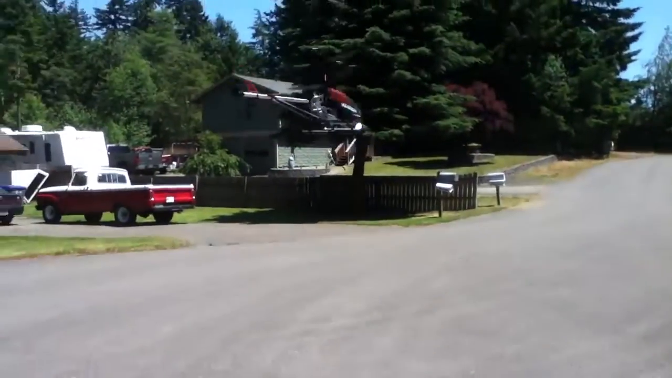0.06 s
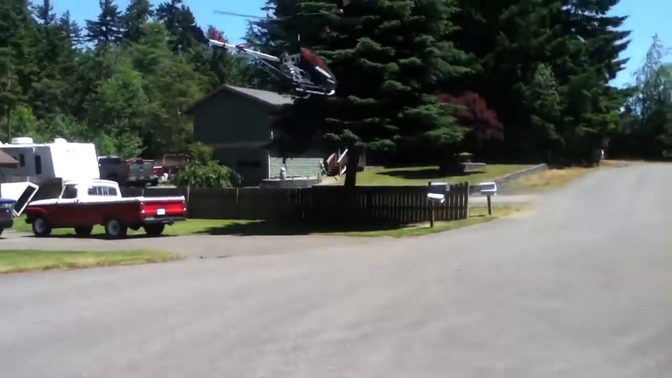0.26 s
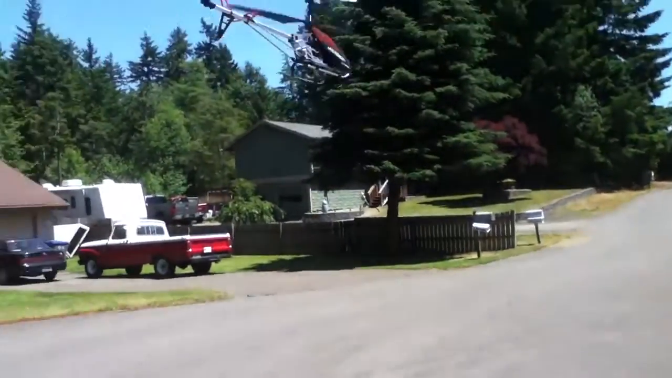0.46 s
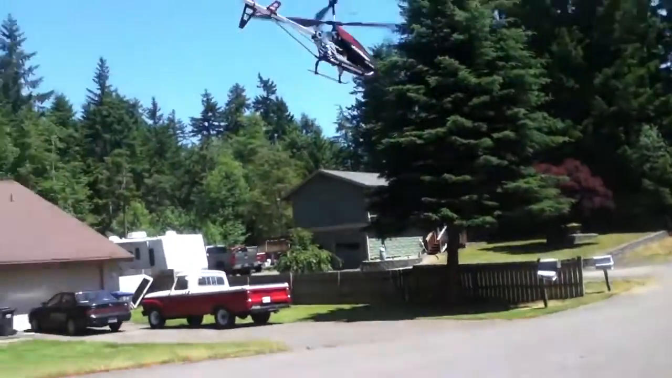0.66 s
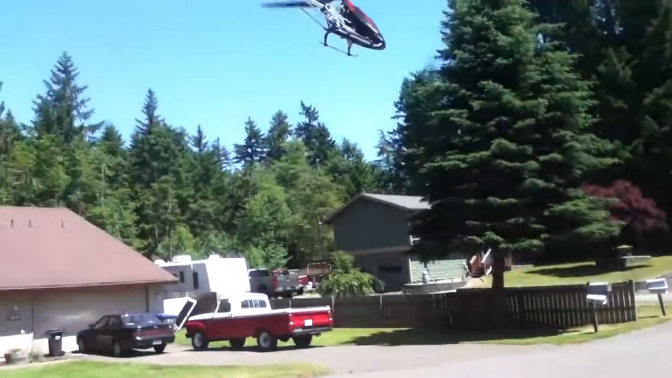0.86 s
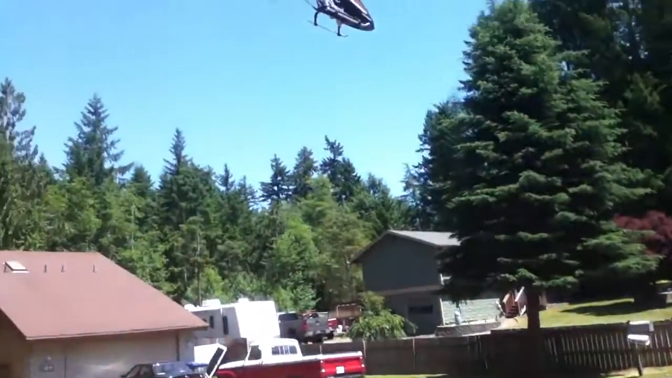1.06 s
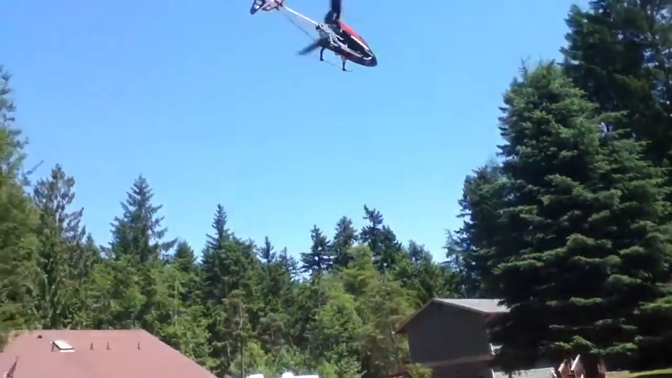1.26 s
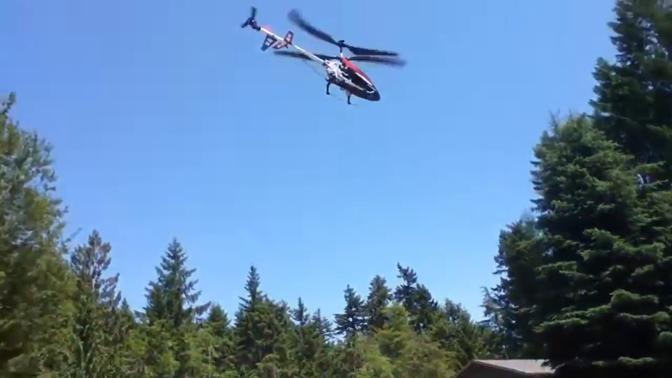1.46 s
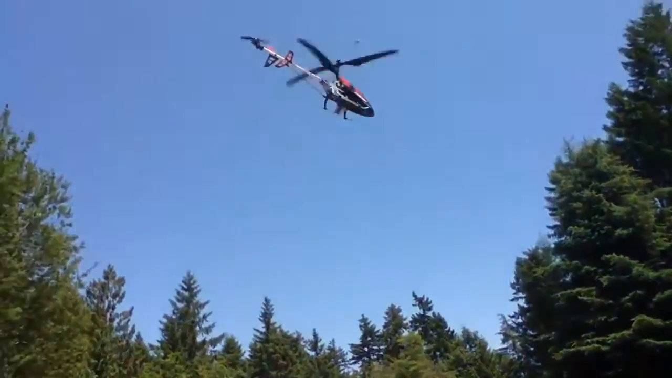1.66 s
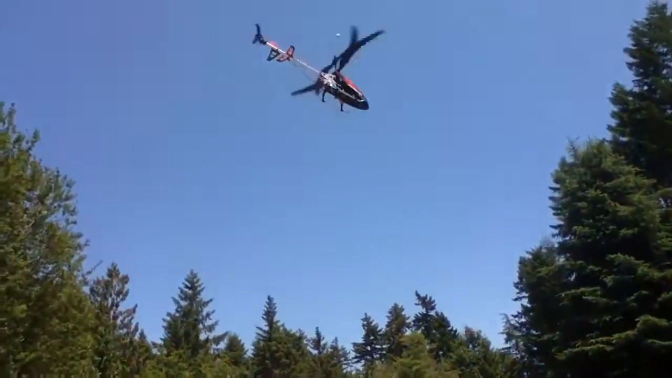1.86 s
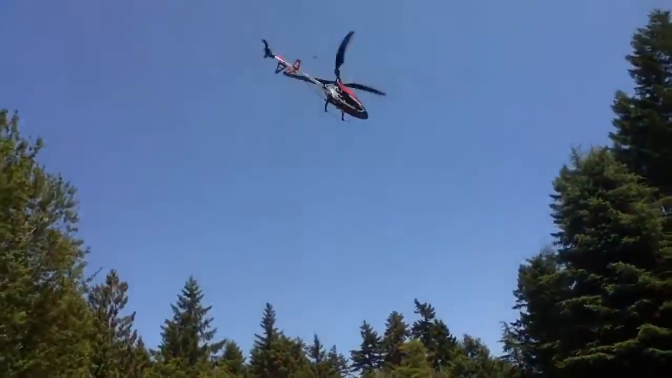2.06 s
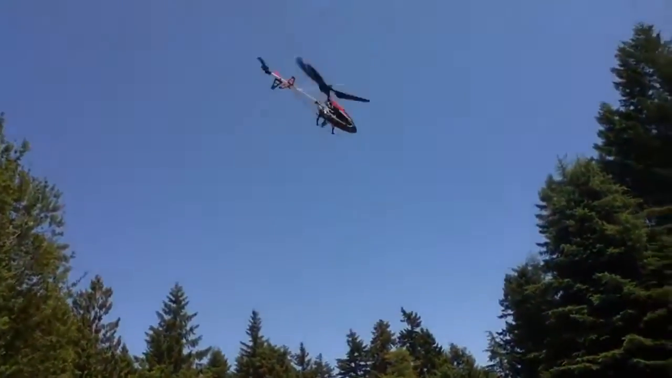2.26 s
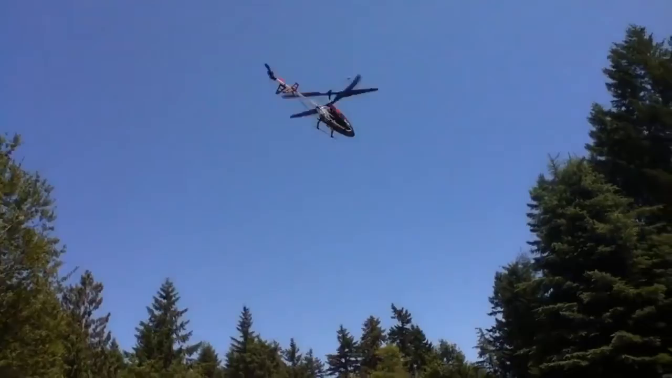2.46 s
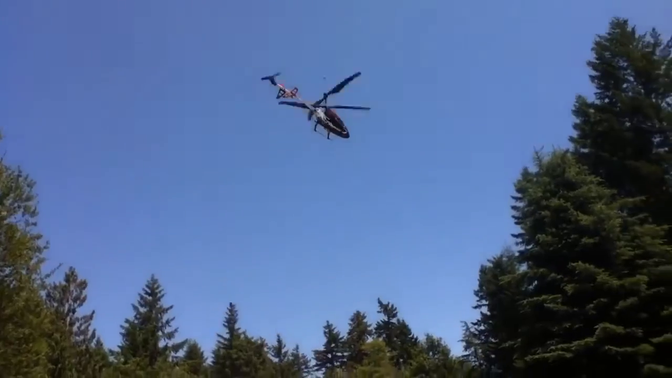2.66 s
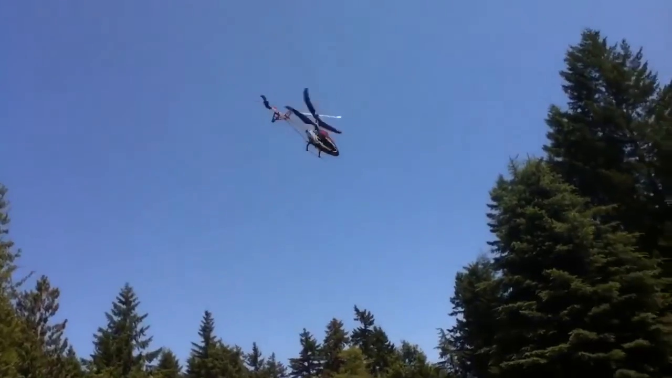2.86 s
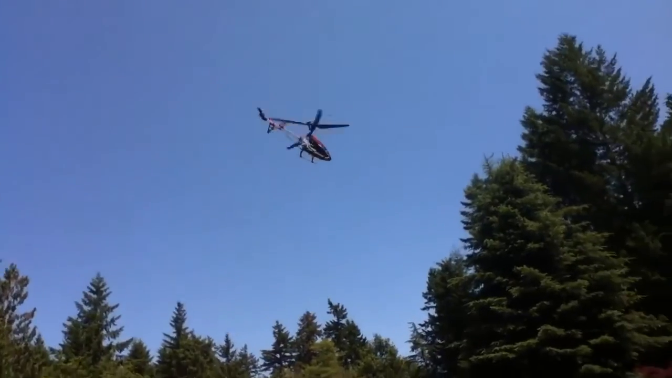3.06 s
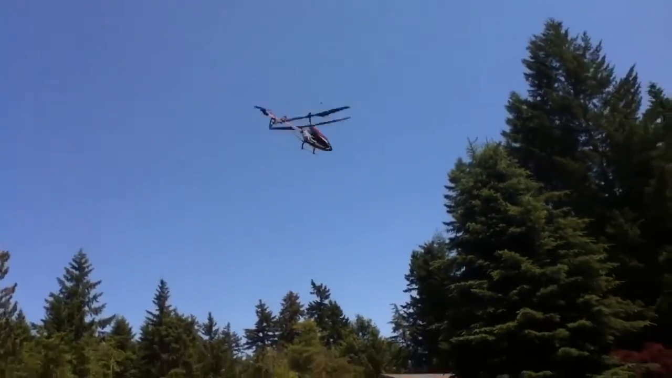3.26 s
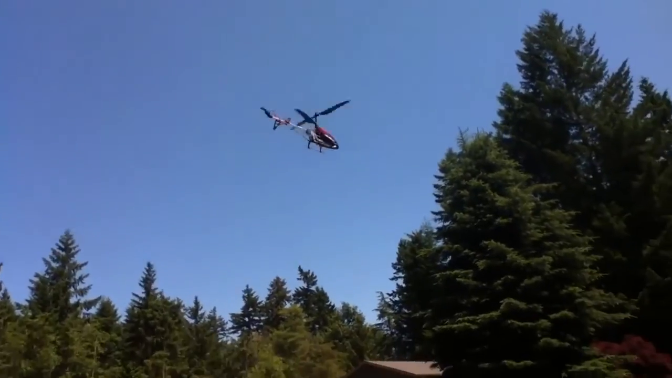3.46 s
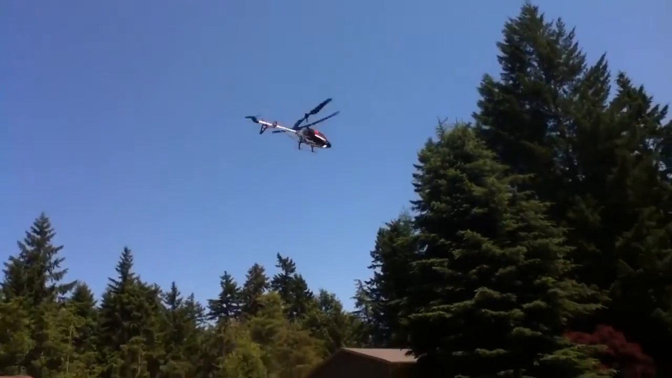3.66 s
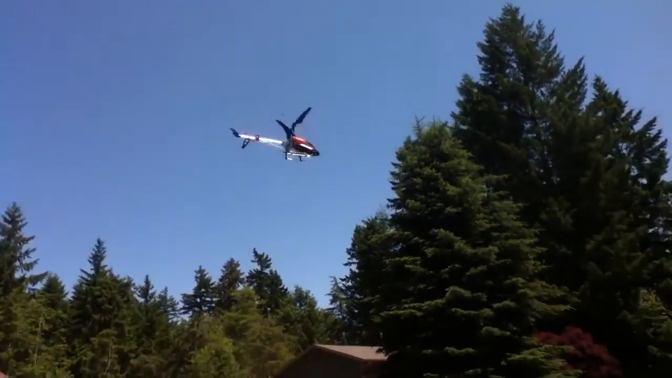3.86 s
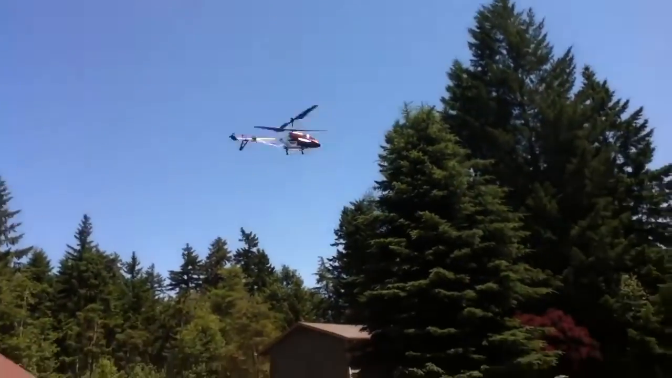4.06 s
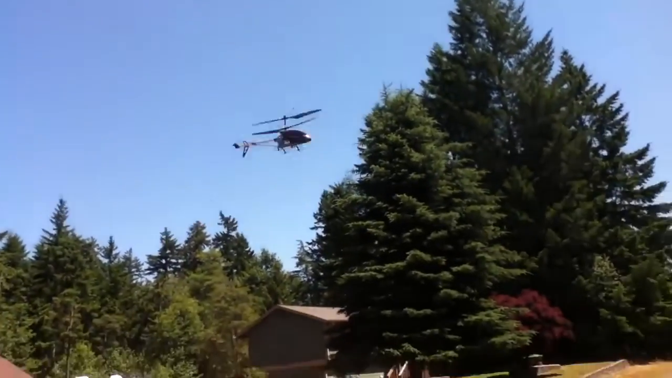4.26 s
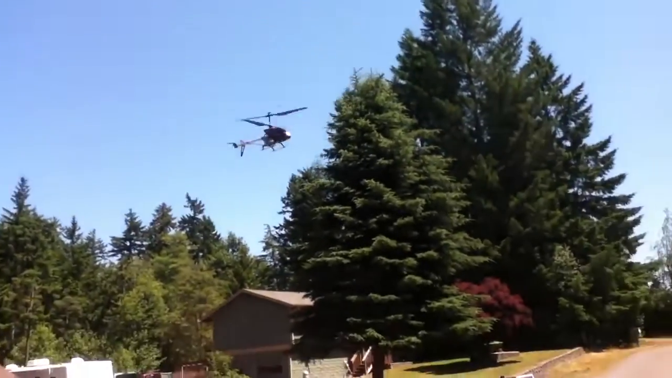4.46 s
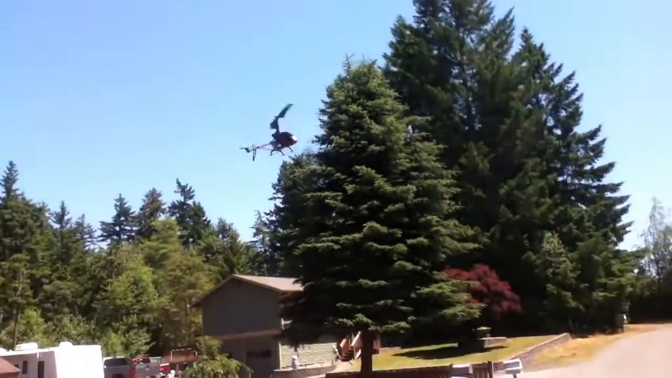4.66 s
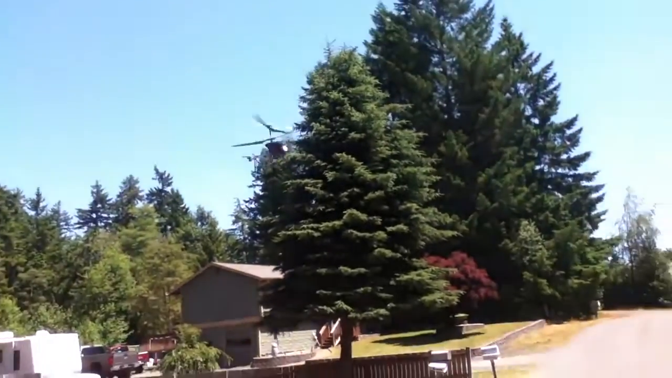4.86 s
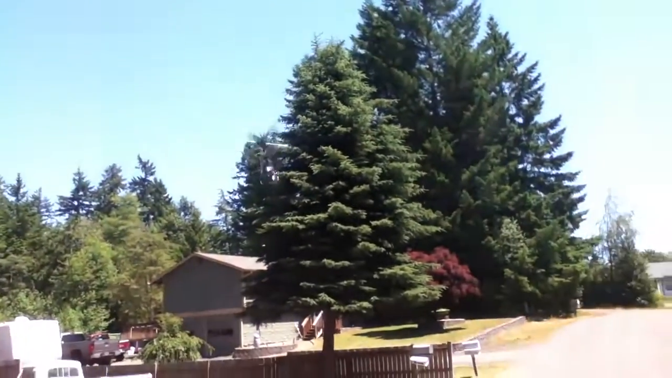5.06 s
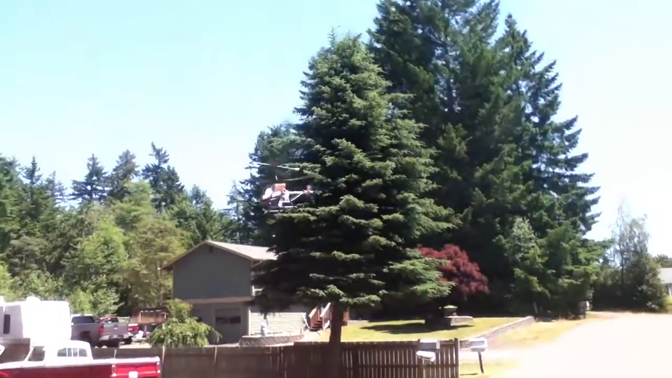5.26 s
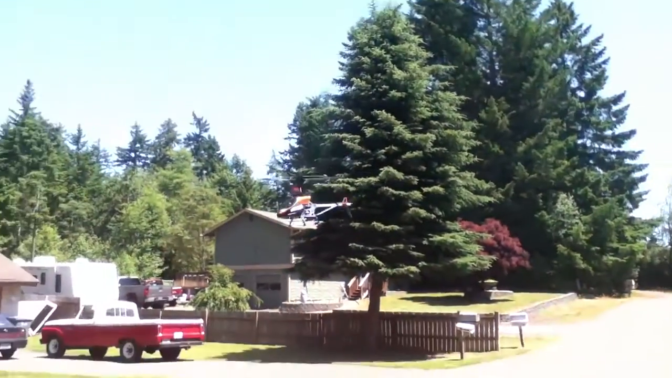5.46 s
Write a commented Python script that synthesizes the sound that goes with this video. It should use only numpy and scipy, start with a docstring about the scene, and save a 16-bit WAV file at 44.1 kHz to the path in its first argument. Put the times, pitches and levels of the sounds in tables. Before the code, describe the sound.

A toy helicopter with two small electric motors flies a few metres from a small camera microphone outdoors. Its harsh, high geared whine warbles about twenty times a second, loudest near the start, then sinks slightly in pitch and recedes. Later the motors split into clashing higher and lower tones, a soft double bump comes, and it ends farther away with abrupt pitch dips and clatter. Light wind puffs.

```python
"""Toy helicopter over a quiet street

A toy coaxial helicopter flies and turns outdoors, a few metres from a pocket camera's microphone.
Two small motors drive the two rotors through plastic gears: shaft-locked tones warble once per rotor turn
and split apart in a turn. Scraping noise makes the gear rasp, random bursts the rattle; the blades thrum
in tones and swish in coloured noise. Wind, a soft double bump and a faint street wash are shaped noise."""
import sys
import numpy as np
from scipy import signal
from scipy.fft import rfft, irfft, next_fast_len
from scipy.io import wavfile
from scipy.ndimage import uniform_filter1d

SR = 44100
rng = np.random.default_rng(int(sys.argv[2]) if len(sys.argv) > 2 else 0)


def generate_wav(sig):
    """Save sig (samples, or channels by samples) to the path in sys.argv[1] as 16-bit PCM at SR."""
    pcm = np.round(np.clip(np.atleast_2d(sig).T, -1, 1) * 32767).astype(np.int16)
    wavfile.write(sys.argv[1], SR, pcm)


N = 243873
TIME = np.arange(N) / SR
HOVER_HZ, FULL_TURN_HZ = 290, 45  # shaft speed in hover; split between the motors in a full turn
PINION_TEETH = 9

# mean shaft speed of the motor that speeds up in a turn: start_s, speed_hz
SHAFT_SPEED_A = [(0, 315), (.3, 311.5), (1, 315), (1.2, 310), (1.44, 290.5), (1.7, 290), (1.95, 292),
                 (2.3, 288.5), (2.65, 286.5), (3.15, 288), (3.45, 297), (3.72, 297), (3.82, 302.5),
                 (3.96, 301.5), (4.12, 311), (4.36, 314), (4.55, 300.5), (4.67, 291), (4.94, 290.5),
                 (5.05, 310), (5.415, 311), (5.455, 283), (5.485, 302), (5.53, 297)]
# mean shaft speed of the motor that slows in a turn: start_s, speed_hz
SHAFT_SPEED_B = [(0, 309), (.5, 309), (.8, 305), (1.15, 308), (1.5, 289), (1.7, 285), (2.1, 285),
                 (2.8, 288), (3.15, 286), (3.55, 280.5), (3.8, 279.5), (4.15, 265), (4.4, 265), (4.65, 280),
                 (4.95, 280), (5.17, 266), (5.39, 270), (5.445, 268), (5.465, 258), (5.48, 287)]
# speed swing of both motors, once per turn of the first rotor: start_s, first_swing_hz, second_swing_hz
SPEED_SWING = [(.25, 4, 3), (.7, 4, 9), (1, 1.5, 6), (1.4, 2.3, 4), (1.9, 1.8, 6), (2.25, 1.5, 6),
               (2.5, 2, 1), (2.8, 2.8, 1), (3.2, 4.5, 5.5), (3.6, 4, 1), (3.75, 3.5, .7), (3.85, 3, 3),
               (4.07, 2, 11), (4.33, 2.5, 7.5), (4.5, 5, 1.5), (4.85, 6, 4), (5.25, 1.5, 3), (5.45, 2.5, 2)]
# commutator buzz of either motor: multiple of shaft speed, relative level_db, chatter share (0-1)
COMMUTATOR_TONE = [(6, 0, 0.49)]


def amp(db):
    """Decibels to gain."""
    return 10 ** (np.asarray(db) / 20)


def unit(x):
    """Scales to rms 1."""
    return x / np.sqrt(np.mean(abs(x) ** 2) + 1e-20)


def curves(table):
    """Each column of a timed table, sample by sample."""
    s, *columns = np.transpose(table)
    return [np.interp(TIME, s, column) for column in columns]


def coloured(x, spectrum):
    """Filters x by a gain curve of (Hz, dB) points, then scales to rms 1."""
    hz, db = np.transpose(spectrum)
    size = next_fast_len(N)
    bin_hz = np.fft.rfftfreq(size, 1 / SR)
    gain = amp(np.interp(np.log(bin_hz + 1), np.log(hz), db))
    return unit(irfft(rfft(x, size) * gain, size)[:N])


def wander(hz):
    """Smooth chance of rms 1, moving at up to about hz."""
    step = 16  # samples between the points of the slow curve
    size = N // step + 2
    f = np.fft.rfftfreq(size, step / SR)
    slow = irfft(rfft(rng.standard_normal(size)) / (1 + (f / hz) ** 2), size)
    return unit(np.interp(np.arange(N) / step, np.arange(size), slow))


def swell(middle, length):
    """A smooth rise to 1 and fall back."""
    return np.cos(np.pi * np.clip((TIME - middle) / length, -.5, .5)) ** 2


def throb(angle, depth_db):
    """A level swing once per cycle of the angle that keeps the mean power."""
    mean_power = np.i0(np.log(10) * depth_db / 10)
    return amp(depth_db * np.cos(angle)) / np.sqrt(mean_power)


def rotor_angle(table, ratio, blade_angle):
    """Angle of a rotor in radians, geared down from its motor by ratio."""
    motor_turns = np.cumsum(curves(table)[0]) / SR
    return 2 * np.pi * motor_turns / ratio + blade_angle


def spin(table, swing, wobble, unsteady, unsteady_hz):
    """Shaft turns of a motor: the changing load speeds and slows it once per wobble of the rotor."""
    speed = curves(table)[0] + swing * np.cos(wobble) + unsteady * wander(unsteady_hz)
    return np.cumsum(speed) / SR


def turning():
    """How far the motors have split to steer: about 0 to 1."""
    return (curves(SHAFT_SPEED_A)[0] - curves(SHAFT_SPEED_B)[0]) / FULL_TURN_HZ


def above_hover(table):
    """Mean shaft speed above hovering speed, in Hz."""
    return curves(table)[0] - HOVER_HZ


def heard(db, turning_db, end_on_db):
    """Gain from a level at 1 m: falls with distance, shifts by so many dB in a full turn and end on."""
    # flight path: start_s, distance_m
    distance = [(0, 2.6), (.8, 1.79), (1.25, 2.24), (2, 2.88), (2.5, 3.5), (3.1, 4.73), (3.6, 4.35),
                (4.35, 4.36), (4.6, 6.5), (5.3, 6.7), (5.53, 4.9)]
    # how far the body swings round: start_s, heading (0 side on, 1 end on)
    heading = [(3.8, 0), (4.35, 0), (4.5, 0.083)]
    level_db = db + turning_db * turning() + end_on_db * curves(heading)[0]
    return amp(level_db) / curves(distance)[0]


def jolt():
    """How far sudden throttle cuts shake the teeth out of mesh."""
    # jolts to the gears: middle_s, length_s, strength
    jolts = [(4.63, .12, 1), (5.485, .035, 1.9), (5.52, .08, 1)]
    return sum(strength * swell(s, length) for s, length, strength in jolts)


def partials(turns, table, chatter_hz):
    """Tones locked to the shaft; play between the teeth makes each one chatter in level and phase."""
    out = np.zeros(N)
    for multiple, db, share in table:
        angle = 2 * np.pi * multiple * turns
        steady = np.sqrt(2 * (1 - share ** 2))  # keeps the mean power whatever the share
        in_phase = (steady + share * wander(chatter_hz)) * np.cos(angle)
        out += amp(db) * (in_phase + share * wander(chatter_hz) * np.sin(angle))
    return out


def motor_a(turns, rotor):
    """Shaft hum, the buzz of brushes and commutator, and the pinion's whine round 2 and 4 times the tooth rate."""
    # shaft hum at the microphone, before its flutter: start_s, level_db
    hum_level = [(.3, -62), (.75, -47.5), (1.05, -53.5), (2.3, -64), (2.6, -56), (3.6, -56.5), (4.2, -51.5),
                 (4.8, -57.5)]
    # tones of brushes, lower gear whine, upper gear whine, and side tones drawn out by the load of a turn;
    # all four: multiple of shaft speed, relative level_db, chatter share (0-1)
    brush_buzz = [(3, -12, 1), (4, -4.5, 0.92), (5, -7.5, 0.95), (10, -2.5, 1), (12, 2, 0.6),
                  (14, 1.5, 0.59)]
    lower_mesh = [(9, -14.5, .8), (17, -17, .9), (18, -1.5, .6), (19, -18, .67), (24, -19, .7),
                  (27, -13, .82)]
    upper_mesh = [(34, -13.5, 0.96), (35, -22, 0.64), (36, -3, 0.96), (37, -11, .9), (38, -12, 0.88),
                  (45, -15, 0.9)]
    side_tones = [(13, -7, .8), (15, 0, .6)]
    whine_db_per_hz, jolt_whine_db = 0.1352, -8  # louder above hovering speed, weaker in a jolt
    effort = amp(whine_db_per_hz * above_hover(SHAFT_SPEED_A) + jolt_whine_db * jolt())

    hum = amp(curves(hum_level)[0]) * unit(np.cos(2 * np.pi * turns) * amp(3.4 * wander(11)))

    brushes = partials(turns, brush_buzz, chatter_hz=45) * throb(rotor - .4, depth_db=-1)
    brushes *= heard(db=-37, turning_db=-2.0, end_on_db=19)

    commutator = partials(turns, COMMUTATOR_TONE, chatter_hz=60) * throb(rotor + 3, depth_db=8.5)
    commutator *= heard(db=-36.5, turning_db=-3.5, end_on_db=48)

    whine = partials(turns, lower_mesh, chatter_hz=138)
    whine *= throb(rotor - 2.4, depth_db=1.0 + 0.8 * turning())
    whine *= heard(db=-18.0, turning_db=0.0, end_on_db=-18) * effort

    upper = partials(turns, upper_mesh, chatter_hz=190) * throb(rotor + 1.5, depth_db=2)
    upper *= heard(db=-19.0, turning_db=-9, end_on_db=-73) * effort

    side = partials(turns, side_tones, chatter_hz=90)
    side *= heard(db=-41, turning_db=14.0, end_on_db=-50)
    # the airframe rocks as it flies, so the whine flutters a little
    flutter = amp(.7 * wander(8))
    return hum + brushes + commutator + (whine + upper + side) * flutter


def motor_b(turns, wobble):
    """Commutator buzz, whine and pinion whistle; a hard swing breaks the whistle into falling chirps."""
    # pinion whistle at the microphone: start_s, level_db
    whistle_level = [(0, -36.5), (.6, -33.5), (1.2, -37.5), (1.8, -33), (2.6, -35), (3.7, -40), (4.35, -38),
                     (4.6, -46.5), (5.15, -46), (5.175, -35.5), (5.41, -36.5), (5.435, -40), (5.458, -30),
                     (5.476, -42), (5.505, -31.5), (5.53, -44)]
    # tones of whistle, upper gear whine, and the pinion ringing clean when seated tightly;
    # all three: multiple of shaft speed, relative level_db, chatter share (0-1)
    whistle_tone = [(9, 0, .33)]
    upper_mesh = [(18, 0.5, .72), (19, -10, .9), (27, -6, .69), (28, -7, .75), (36, -18, .94)]
    seated_tone = [(18, 0, .35)]
    # spells of strain: middle_s, length_s, whine_change_db
    strains = [(0.763, 2.2, 7.5), (1.949, 1.25, 0.5), (3.55, 0.49, -1), (4.147, 0.8, 5.5),
               (4.824, 0.67, 8.5)]
    # the tightly seated spell: middle_s, length_s, level_db at the microphone
    seated = (3.61, 0.32, -34)
    shake_per_hz = .0007  # turns of shake per Hz above hovering speed

    commutator = partials(turns, COMMUTATOR_TONE, chatter_hz=80) * throb(wobble - 1.9, depth_db=9)
    commutator *= heard(db=-35.0, turning_db=-6, end_on_db=-4)

    swing_hz = curves(SPEED_SWING)[1]
    chirping = throb(wobble - 1.7, depth_db=np.minimum(.1 * swing_hz ** 2, 7))
    # above hovering speed the pinion shakes on its shaft
    shake = shake_per_hz * np.maximum(above_hover(SHAFT_SPEED_B), 0) * wander(130)
    whistle = partials(turns + shake, whistle_tone, chatter_hz=88.4) * chirping
    whistle *= amp(curves(whistle_level)[0])

    strain = amp(sum(db * swell(s, length) for s, length, db in strains))
    whine = partials(turns, upper_mesh, chatter_hz=140) * throb(wobble - 1, depth_db=1.5)
    whine *= heard(db=-29.0, turning_db=2.5, end_on_db=18) * strain

    middle, length, db = seated
    ring = amp(db) * np.sqrt(swell(middle, length)) * partials(turns, seated_tone, chatter_hz=50)
    return commutator + whistle + whine + ring


def armatures(turns, rotor):
    """The armatures buzz as one tone at the motors' mean speed, in beats that are smoother at speed."""
    # armature buzz: multiple of shaft speed, relative level_db, chatter share (0-1)
    armature_tone = [(3, 0.5, 0.43)]
    beat_db, beat_db_per_hz = 5.2, -.22  # depth at hovering speed and its change above
    depth_db = np.minimum(beat_db + beat_db_per_hz * above_hover(SHAFT_SPEED_B), beat_db)
    buzz = partials(turns, armature_tone, chatter_hz=37.6) * throb(rotor + 1.9, depth_db)
    return heard(db=-32.5, turning_db=-10.0, end_on_db=0) * buzz


def brush_whistle(turns):
    """The first motor's brushes sing a thin, steady tone for a while."""
    # the singing spell: middle_s, length_s, level_db at the microphone
    singing = (2.24, 2.2, -41.5)
    # its tone: multiple of shaft speed, relative level_db, chatter share (0-1)
    singing_tone = [(10, 0, .3)]
    middle, length, db = singing
    return amp(db) * np.sqrt(swell(middle, length)) * partials(turns, singing_tone, chatter_hz=40)


def gear_rasp(rotor):
    """Teeth scrape unevenly, harder once per rotor turn, most of all while steering."""
    # colour of the scraping: frequency_hz, relative gain_db
    rasp_colour = [(1500, -18.5), (2200, -7.5), (3000, -0.5), (4000, -2.5), (4900, 4.5), (5500, 6),
                   (6000, 2), (6350, 0), (6750, 5.5), (7300, 4), (8100, 2.5), (9200, 1), (10600, 4),
                   (12200, -4.5), (13700, -1), (15000, -11)]
    load = throb(rotor - 2.4, depth_db=0.17 + 1.4 * turning())
    unevenness = amp(1.34 * wander(105) + 0.65 * wander(15.0))
    scrape = coloured(rng.standard_normal(N) * load * unevenness, rasp_colour)
    return heard(db=-17.0, turning_db=0.5, end_on_db=-4.0) * scrape


def knocks(turns, count, ring_s):
    """Uneven random knocks, each a brief burst at count times the shaft speed, at rms 1 overall."""
    knocks_per_s, spread_db = 380, 12
    struck = rng.random(N) < knocks_per_s / SR
    sizes = struck * amp(spread_db * rng.random(N))
    phases = np.exp(2j * np.pi * rng.random(N))
    t = np.arange(SR // 100) / SR
    bursts = signal.oaconvolve(sizes * phases, t * np.exp(-t / ring_s))[:N]
    return unit((bursts * np.exp(2j * np.pi * count * turns)).real)


def gear_rattle(turns):
    """When the throttle eases, slack teeth knock across their play; a jolt makes them clatter."""
    rattle_db_per_hz, clatter_db = -0.2355, -36  # clatter at a jolt of strength 1
    slack = amp(rattle_db_per_hz * above_hover(SHAFT_SPEED_A))
    low = knocks(turns, count=2 * PINION_TEETH, ring_s=.0006)
    low *= heard(db=-20.0, turning_db=-13, end_on_db=19)
    high = knocks(turns, count=4 * PINION_TEETH, ring_s=.0003)
    high *= heard(db=-22.5, turning_db=1.5, end_on_db=-75)
    clatter = amp(clatter_db) * jolt() * knocks(turns, count=16, ring_s=.0004)
    return clatter + slack * (low + high)


def blades(rotor_a, rotor_b):
    """Counter-rotating blades thrum as they cross, at the rotors' summed speed; the air swishes evenly."""
    # thrum; the blades cross on the even multiples: multiple of summed rotor speed, relative level_db
    thrum_tones = [(2, -21), (3, -3.5), (5, -25), (7, -2), (8, 0.5), (10, 1), (12, -8), (13, -6.5),
                   (14, -2.5), (17, -4)]
    # the two strongest partials, at the microphone: start_s, fourth_multiple_db, sixth_multiple_db
    deep_levels = [(.25, -58, -50), (.55, -60, -62), (.98, -49, -52), (1.3, -59, -48.5), (2.2, -62, -52.5),
                   (2.65, -54.5, -55), (3.3, -55, -66), (3.7, -65, -68), (4.6, -57, -60), (4.9, -57, -53.5),
                   (5.5, -55, -54)]
    # colour of the swish: frequency_hz, relative gain_db
    swish_colour = [(30, -30), (60, -35), (110, -7), (200, -6.5), (300, -7), (500, -5.5), (760, -9),
                    (880, 5), (1050, -2.5), (1450, 2.5), (1700, 5.5), (2100, -1.5), (4000, 4),
                    (12000, -21.5)]
    crossing = rotor_a + rotor_b
    thrum = sum(amp(db + wander(3)) * np.cos(k * crossing) for k, db in thrum_tones)
    thrum *= heard(db=-48.0, turning_db=-9.0, end_on_db=34)
    deep = sum(amp(db) * np.cos(k * crossing) for k, db in zip((4, 6), curves(deep_levels)))
    swish = coloured(rng.standard_normal(N), swish_colour)
    swish *= heard(db=-26.0, turning_db=-0.8, end_on_db=20.0)
    return deep + thrum + swish


def bumps():
    """Two dull puffs of noise in quick succession, each under half a sine."""
    # soft bumps: start_s, level_db, length_s
    puffs = [(4.593, -40, 0.024), (4.617, -36, 0.02)]
    # their colour: frequency_hz, relative gain_db
    puff_colour = [(60, -4), (250, -1), (450, -1), (800, 2), (1300, -6), (2500, -7), (6000, -40)]
    level = np.zeros(N)
    for s, db, length in puffs:
        level += amp(db) * np.sin(np.pi * np.clip((TIME - s) / length, 0, 1))
    return level * coloured(rng.standard_normal(N), puff_colour)


def wind():
    """Gusts on the microphone over a light steady breeze; their strength sets the size of the rumble."""
    # gusts: middle_s, length_s, level_db
    gusts = [(0.03, 0.16, -38), (0.081, 0.073, -38.5), (0.36, 0.25, -54), (2.933, 0.079, -53),
             (3.742, .06, -49), (3.822, 0.08, -46.5), (4.015, 0.17, -56), (4.1, 1.7, -60),
             (4.245, .04, -51), (4.288, 0.041, -41.5), (4.408, .06, -47), (4.467, .04, -51),
             (4.56, 0.14, -54)]
    # colour of the rumble: frequency_hz, relative gain_db
    wind_colour = [(20, -24), (45, 1), (95, 4.5), (135, -4), (250, -17.5), (800, -53)]
    breeze_db = -64
    level = amp(breeze_db) + sum(amp(db) * swell(s, length) for s, length, db in gusts)
    rumble = coloured(rng.standard_normal(N), wind_colour)
    # level out the noise's own swings
    even_rumble = rumble / np.sqrt(uniform_filter1d(rumble ** 2, size=SR // 12))
    return level * even_rumble


def street():
    """A low outdoor wash of coloured noise."""
    # the street's faint background: start_s, level_db
    wash_level = [(0, -57.5), (4.4, -52.5), (5.53, -45)]
    # its colour: frequency_hz, relative gain_db
    wash_colour = [(30, -25), (150, 1.5), (500, -1), (1000, -2.5), (4000, -21.5)]
    return amp(curves(wash_level)[0]) * coloured(rng.standard_normal(N), wash_colour)


def scene():
    """The helicopter in open air, heard by a single microphone on two equal channels."""
    rotor_a = rotor_angle(SHAFT_SPEED_A, ratio=15.89, blade_angle=-4.2)
    rotor_b = rotor_angle(SHAFT_SPEED_B, ratio=15.78, blade_angle=2.724)
    # the second motor feels the first rotor's wobble earlier, and later in a full turn (radians)
    wobble_lead, wobble_turn_lag = 0.3, 1.7
    wobble_b = rotor_a + wobble_lead - wobble_turn_lag * turning()
    swing_a, swing_b = curves(SPEED_SWING)
    turns_a = spin(SHAFT_SPEED_A, swing_a, rotor_a, unsteady=0.98, unsteady_hz=40.8)
    turns_b = spin(SHAFT_SPEED_B, swing_b, wobble_b, unsteady=0.767, unsteady_hz=29.8)
    motors = motor_a(turns_a, rotor_a) + motor_b(turns_b, wobble_b)
    motors += armatures((turns_a + turns_b) / 2, rotor_b) + brush_whistle(turns_a)
    gears = gear_rasp(rotor_a) + gear_rattle(turns_a)
    helicopter = motors + gears + blades(rotor_a, rotor_b)
    return np.tile(helicopter + bumps() + wind() + street(), (2, 1))


def record(dry):
    """The camera's band limit: a steep low-pass."""
    cutoff_hz = 15700
    low_pass = signal.firwin(511, cutoff_hz, window=("kaiser", 9), fs=SR)
    return signal.oaconvolve(dry, low_pass[None], "same")


dry = scene()
out = record(dry)
generate_wav(out)
```